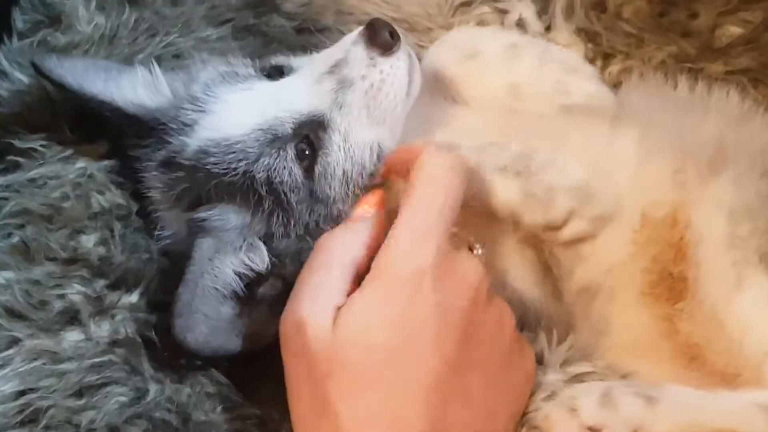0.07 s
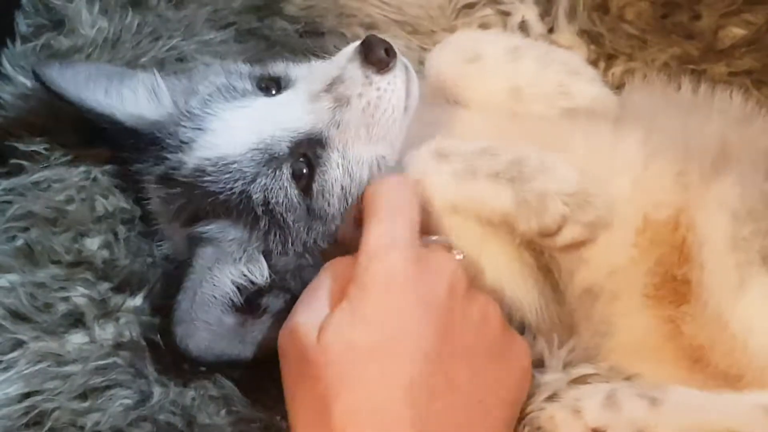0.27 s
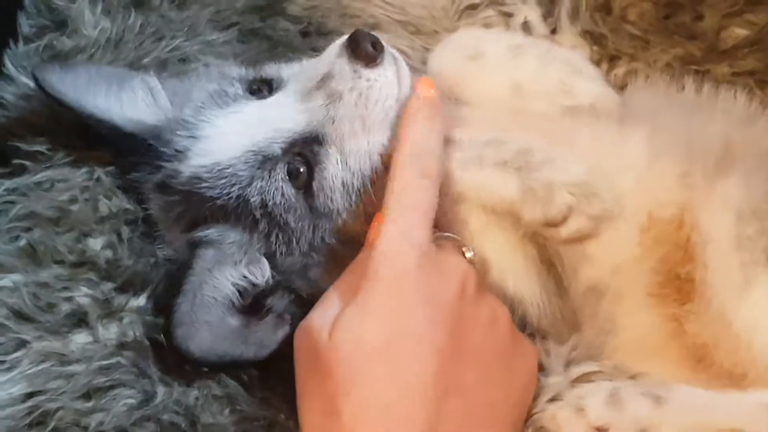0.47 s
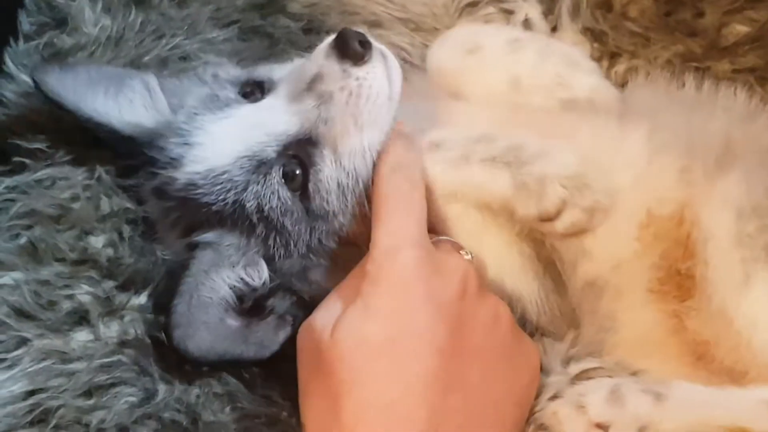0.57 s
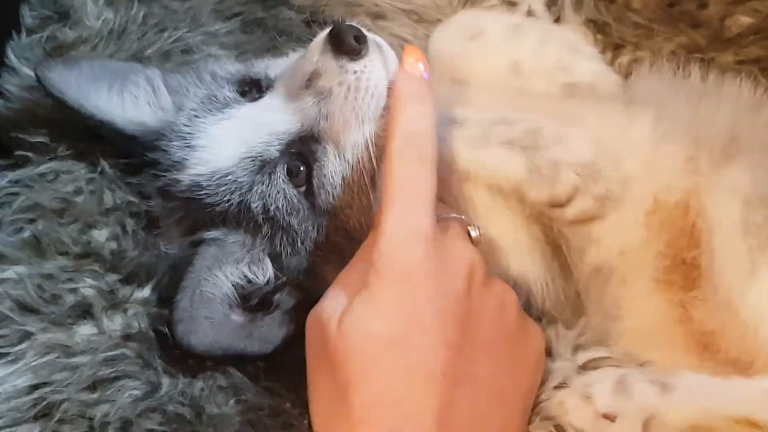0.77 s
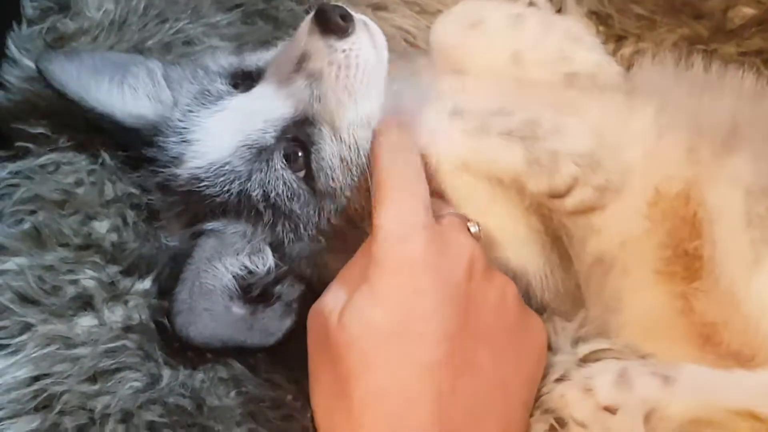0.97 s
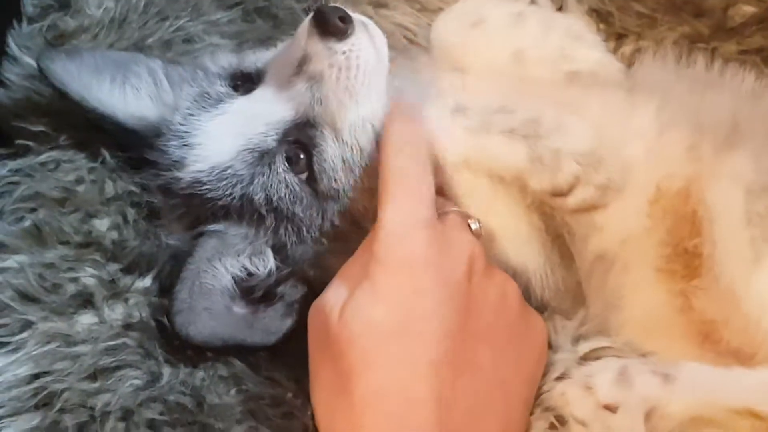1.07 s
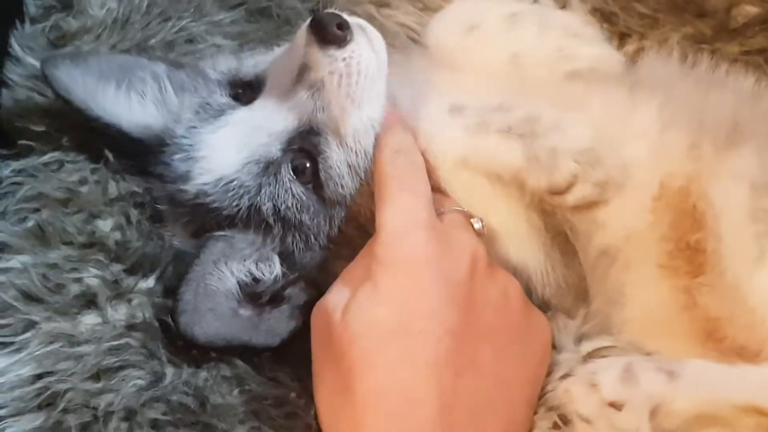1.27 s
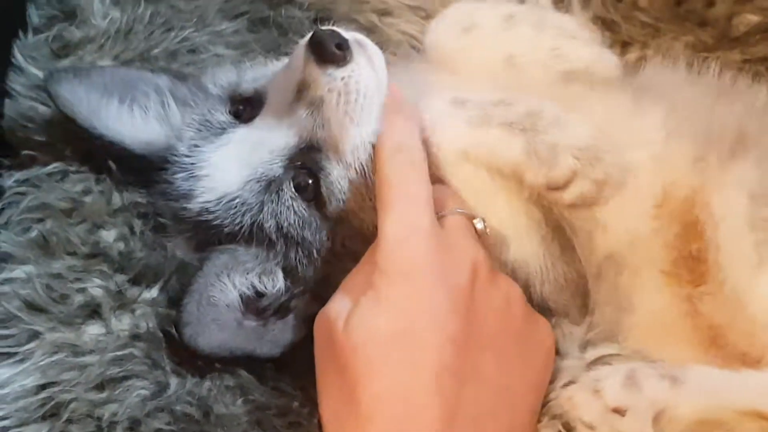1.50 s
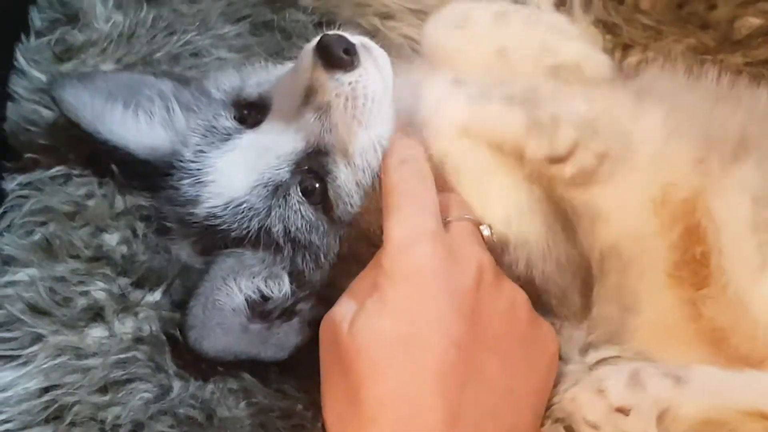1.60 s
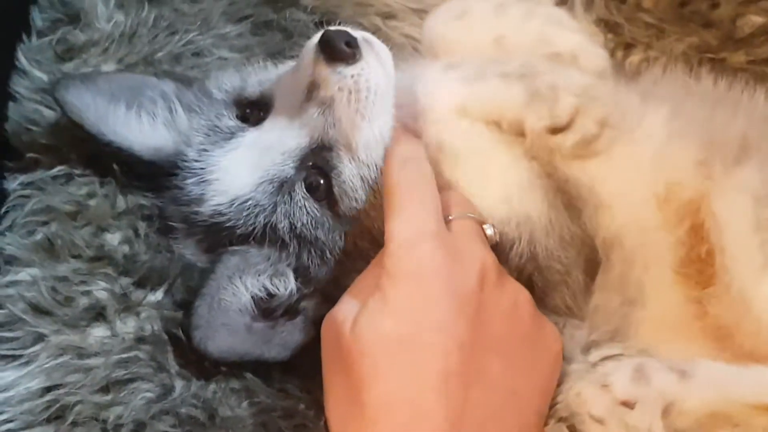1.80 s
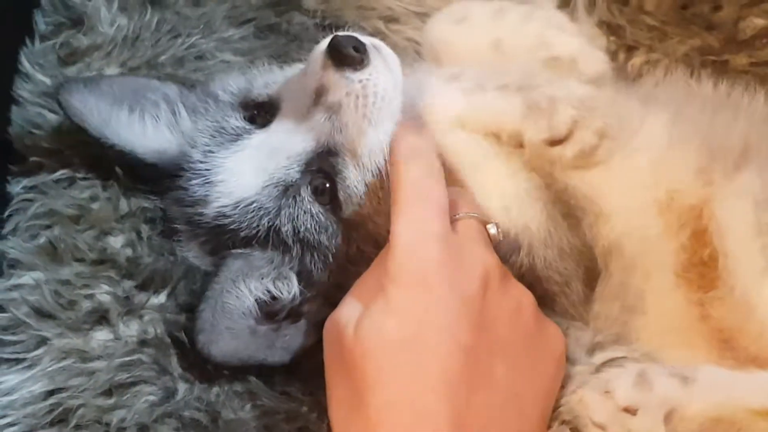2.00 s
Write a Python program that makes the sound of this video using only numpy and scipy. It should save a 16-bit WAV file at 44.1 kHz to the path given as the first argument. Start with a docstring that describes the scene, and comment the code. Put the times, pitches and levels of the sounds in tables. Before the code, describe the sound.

Close by in a small room, a fox squawks once, high and hoarse, over a low hum and faint whirr. A soft breath, a light rub of fur and a thin sniff follow, all very quiet.

```python
"""A pet fox squawks

Stroked on a furry blanket in a small room, a fox gives one close, raspy squawk. Turbulent breath opens
it as a hiss, vibrating vocal folds carry a high arch of pitch, and the rasp returns; throat and mouth
resonances shape both. A soft puff and a thin sniff follow, and the walls reflect each sound.
Behind it a machine hums with a faint, unsteady whirr."""
import sys
import numpy as np
from scipy import signal
from scipy.fft import rfft, irfft
from scipy.io import wavfile

SR = 44100
rng = np.random.default_rng(int(sys.argv[2]) if len(sys.argv) > 2 else 0)


def dump(signal):
    """Clip the signal to [-1, 1] and save it as 16-bit WAV at the path in sys.argv[1]."""
    limited = np.clip(np.atleast_2d(signal).T, -1, 1)
    pcm = np.round(limited * 32767).astype(np.int16)
    wavfile.write(sys.argv[1], SR, pcm)


N = 90404
T, HZ = np.arange(N) / SR, np.fft.rfftfreq(N, 1 / SR)


def amp(db):
    """Amplitude ratio of a level in decibels."""
    return 10 ** (np.asarray(db) / 20)


def unit(x):
    """Normalisation to rms 1."""
    return x / np.sqrt(np.mean(x ** 2) + 1e-20)


def curve(points, outside=None):
    """Linear interpolation in time; the ends hold unless an outside value is given."""
    return np.interp(T, *np.transpose(points), left=outside, right=outside)


def spectrum(points, hz=HZ):
    """Interpolation over log frequency."""
    f, value = np.transpose(points)
    return np.interp(np.log(hz + 1), np.log(f), value)


def colour(x, gain):
    """Filtering by multiplication in the frequency domain."""
    return irfft(rfft(x) * gain, N)


def wander(hz):
    """Random modulation: noise low-passed at hz, rms 1."""
    return unit(colour(rng.standard_normal(N), (HZ > 0) / (1 + (HZ / hz) ** 4)))


def band(x, hz, octaves):
    """Gaussian band-pass in log frequency, scaled to rms 1."""
    return unit(colour(x, np.exp(-.5 * (np.log2((HZ + 1) / hz) / octaves) ** 2)))


def swell(noise, peak_s, length_s, db, hz, octaves):
    """Amplitude modulation of a noise band by one cosine arch."""
    envelope = np.cos(np.pi * np.clip((T - peak_s) / length_s, -.5, .5))
    return amp(db) * envelope * band(noise, hz, octaves)


def pan(points):
    """Interchannel level difference as left and right gains of mean 1."""
    sides = amp(np.outer([.5, -.5], spectrum(points)))
    return sides / sides.mean(0)


# Left-right coherence of the room's field: f/Hz, coherence/1
COHERENCE = [(50, 1), (250, 0.91), (600, 0.63), (1200, 0.33), (2600, 0.65), (5000, 0.17), (12000, 0.15)]
def diffuse():
    """A diffuse field is only partly coherent between two points."""
    common, independent = rng.standard_normal((2, N))
    coherence = np.clip(spectrum(COHERENCE), -1, 1)
    right = colour(common, coherence) + colour(independent, np.sqrt(1 - coherence ** 2))
    return np.array([common, right])


# Spectral density of the room's air: f/Hz, relative level/dB
AIR_SPECTRUM = [(20, -20), (32, -24), (55, -7), (100, 0), (140, 0), (185, -6.5), (300, -4), (410, -13.5),
                (620, -11.5), (850, -16), (1500, -15), (2200, -20), (2750, -19.5), (3150, -29.5),
                (4500, -30), (6000, -30.5), (7200, -36.5), (9500, -36), (12000, -34), (16000, -36.5)]
def room_air():
    """Ambient noise: a diffuse field whose level drifts slightly."""
    noise = unit(colour(diffuse(), amp(spectrum(AIR_SPECTRUM))))
    return amp(-55.5 + 1.06 * wander(hz=8.6)) * noise


# Hum partials: f/Hz, level/dB, rms frequency deviation/Hz
HUM_PARTIALS = [(42.5, -61.5, 3.6), (146.9, -61, 5.4), (211.4, -70, 9.2), (287.2, -65.5, 6.2),
                (560, -74, 15.29), (650.5, -73, 8.85)]
def machine_hum():
    """Random frequency modulation broadens each spectral line of the machine."""
    hum = np.zeros(N)
    for hz, db, deviation in HUM_PARTIALS:
        cycles = rng.random() + np.cumsum(hz + deviation * wander(hz=10.73)) / SR
        hum += amp(db) * np.sqrt(2) * np.cos(2 * np.pi * cycles)
    return hum


# Envelope of the whirr: t/s, level/dB
WHIRR_LEVEL = [(0, -62.5), (.1, -69.5), (.18, -57.5), (.28, -69.5), (.7, -65.5), (.93, -62.5),
               (1.03, -67.5), (1.1, -80), (1.15, -63.5), (1.39, -61.5), (1.5, -68.5), (1.6, -67.5),
               (1.74, -62), (1.8, -70), (2.04, -64)]
def machine_whirr():
    """Narrow-band noise is heard as an unsteady pitch."""
    level_db = curve(WHIRR_LEVEL) + 1.5 * wander(hz=25)
    return amp(level_db) * band(diffuse(), hz=2585, octaves=.069)


# Soft low swells: peak t/s, duration/s, level/dB, centre f/Hz, width/octaves
LOW_SWELLS = [(0.243, 0.11, -59.5, 140, 0.63), (0.386, 0.071, -56, 214, 0.54),
              (0.676, 0.18, -57, 168.3, 0.67), (1.02, 0.16, -52.5, 138.5, 0.4),
              (1.003, 0.19, -61.5, 326, 0.18), (1.357, 0.13, -56, 286, 0.26),
              (1.78, 0.25, -57.5, 149, 0.19)]
def low_swells():
    """Low bands of diffuse noise each rise and fall once."""
    return sum(swell(diffuse(), *row) for row in LOW_SWELLS)


# Finger strokes: peak t/s, duration/s, level/dB, centre f/Hz, width/octaves
FUR_STROKES = [(1.26, 0.21, -62.5, 1080, 0.67), (1.417, 0.19, -73, 3900, 0.7)]
def stroking():
    """Friction of a finger on fur radiates broad bands of noise."""
    return sum(swell(diffuse(), *row) for row in FUR_STROKES)


# Reverberation time: f/Hz, T60/s
DECAY_TIME = [(300, 0.91), (2500, 0.42), (4500, 0.35), (8000, 0.38), (15000, 0.083)]
# Colour of the reflected sound: f/Hz, gain/dB
REFLECTED_GAIN = [(1000, -7), (2400, -1.5), (3400, -2), (5500, -3.5), (7500, -10.5), (12000, 0)]
# Echoes from nearby surfaces: left delay/s, right delay/s, gain/dB
EARLY_ECHOES = [(.0058, .0058, -10), (.0082, .0083, -17), (.0099, .0104, -14.5), (0.0117, 0.013, -12)]
def reverberation(x):
    """Convolution with early echoes and a sparse tail that decays exponentially in each band."""
    taps_per_s, onset_s = 5000, .009
    taps = rng.choice([-1., 1.], (2, N))
    taps *= (rng.random((2, N)) < taps_per_s / SR) * (T > onset_s)
    hz, t, bands = signal.stft(taps, SR, nperseg=256)
    decay = amp(-60 * t / spectrum(DECAY_TIME, hz)[:, None])
    tail = signal.istft(bands * decay, SR, nperseg=256)[1]
    tail /= np.linalg.norm(tail, axis=1, keepdims=True)
    early = sum(amp(db) * np.exp(-2j * np.pi * np.outer([left, right], HZ))
                for left, right, db in EARLY_ECHOES)
    reflected = colour(x, amp(spectrum(REFLECTED_GAIN)))
    return colour(reflected, early) + signal.fftconvolve(reflected[None], tail, axes=1)[:, :N]


# A puff, then faint sniffs: peak t/s, duration/s, level/dB, centre f/Hz, width/octaves
BREATHS = [(0.727, .17, -57.5, 1410, 0.44), (1.691, 0.075, -71.5, 4530, 0.058),
           (1.784, 0.32, -77, 3240, 0.2)]
def puff_and_sniffs():
    """Turbulence in the fox's breath makes brief bands of noise."""
    return sum(swell(rng.standard_normal(N), *row) for row in BREATHS)


# Throat and mouth response to the rasp: f/Hz, relative gain/dB
RASP_FORMANTS = [(400, -48), (1200, -14.5), (1900, -10), (2400, 1.5), (2950, -5.5), (3350, -5),
                 (3800, -1.5), (4400, 7), (5200, -1), (5700, 4), (6400, -9), (7600, -3), (8700, -6.5),
                 (9600, -24.5), (11700, -16.5), (13600, -27), (15500, -30)]
def rasping_air(phase):
    """Turbulent flow, pulsed by the folds and rattling at random, excites the vocal tract."""
    pulses = 1 + .46 * np.cos(phase)
    air = rng.standard_normal(N) * pulses
    rattle_db = 1.5 * wander(hz=202)
    return unit(colour(air * amp(rattle_db), amp(spectrum(RASP_FORMANTS))))


# Throat and mouth response to the voice: f/Hz, relative gain/dB
VOICE_FORMANTS = [(850, -29), (1700, -15.5), (2550, -14), (3400, 0), (4250, -7), (5100, -5), (5950, -9),
                  (6800, -10), (7700, -10), (8550, -15), (9600, -37.5), (11900, -22.5), (13600, -38),
                  (15400, -30)]
def vocal_folds(phase):
    """Source and filter: the folds' harmonics, each shimmering by itself, pass the vocal tract."""
    harmonics = np.zeros(N)
    for k in range(1, 20):
        shimmer_db = 3 * wander(hz=61)
        harmonics += amp(shimmer_db) * np.cos(k * phase + 2 * np.pi * rng.random())
    flutter_db = 1.6 * wander(hz=90)
    return unit(colour(harmonics, amp(spectrum(VOICE_FORMANTS)))) * amp(flutter_db)


def closing_mouth(x):
    """The closing jaws act as a low-pass filter at the end of the call."""
    shut_s, fade_db_per_s, cutoff_hz = .577, 350, 6550
    low = colour(x, 1 / (1 + (HZ / cutoff_hz) ** 10))
    return low + (x - low) * amp(-fade_db_per_s * np.maximum(T - shut_s, 0))


# Fundamental of the folds: t/s, f/Hz
CALL_PITCH = [(.34, 770.5), (.385, 805), (.405, 825.4), (.425, 838), (.445, 842), (.465, 856.7),
              (.495, 863), (.53, 852.6), (.555, 843.7), (.6, 817)]
# Envelope of the call: t/s, level/dB
CALL_LEVEL = [(.333, -79), (.35, -57), (.368, -47), (.395, -42.5), (.42, -37), (.47, -40.5), (.505, -39.5),
              (.538, -38.5), (.562, -40), (.585, -45), (.603, -45.5), (.63, -82)]
# Balance of the call: t/s, rasp share/1 (0 all voice, 1 all rasp)
ROUGHNESS = [(.382, 0.73), (.405, 0.11), (.425, 0.31), (.455, 0), (.52, 0), (.545, 0.24), (.562, 0.38),
             (.582, 0.67)]
def squawk():
    """Phonation trades power with turbulence; pitch jitter grows with the share of rasp."""
    rough = curve(ROUGHNESS)
    jitter = .00658 + .0498 * rough ** 2
    pitch_hz = curve(CALL_PITCH) * (1 + jitter * wander(hz=149))
    phase = 2 * np.pi * np.cumsum(pitch_hz) / SR
    envelope = amp(curve(CALL_LEVEL, outside=-np.inf))
    envelope /= np.hypot(rough, 1 - rough)  # equal-power crossfade
    voice = amp(-1.8) * envelope * (1 - rough) * vocal_folds(phase)
    rasp = amp(.4) * envelope * rough * rasping_air(phase)
    return closing_mouth(voice), closing_mouth(rasp)


# Direction of the background: f/Hz, left minus right level/dB
BACKGROUND_BALANCE = [(150, 0), (380, 0), (700, 6.5), (1300, 2.5), (2000, -6), (2600, 1), (4400, -6),
                      (6000, 6), (8100, 4), (12000, 1)]
# Direction of the fox: f/Hz, left minus right level/dB
FOX_BALANCE = [(1700, -1), (2600, 0), (3400, -1), (5100, -2.5), (6000, 3.5), (6800, 13), (8500, 13),
               (12000, 10), (15500, 12)]
def scene():
    """Superposition of the background, the fox and its reflections."""
    voice, rasp = squawk()
    breaths = puff_and_sniffs()
    reflections = reverberation(amp(2) * voice + amp(3) * rasp + breaths)
    fox = voice + rasp + breaths + reflections
    background = room_air() + machine_hum() + machine_whirr() + low_swells() + stroking()
    return colour(background, pan(BACKGROUND_BALANCE)) + colour(fox, pan(FOX_BALANCE))


def record(dry):
    """Band limiting by a linear-phase low-pass filter."""
    cutoff_hz = 15780
    lowpass = signal.firwin(511, cutoff_hz, window=("kaiser", 9), fs=SR)
    return signal.oaconvolve(dry, lowpass[None], "same")


dry = scene()
out = record(dry)
dump(out)
```